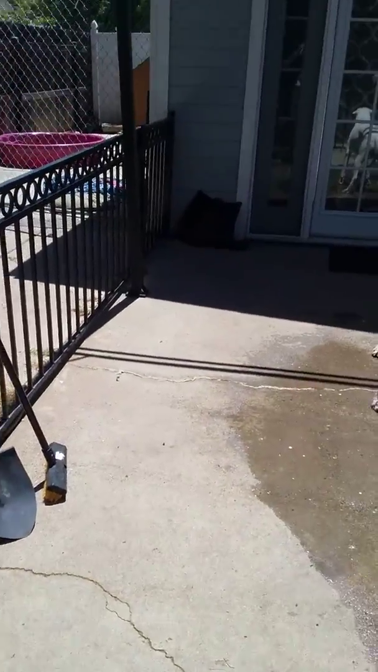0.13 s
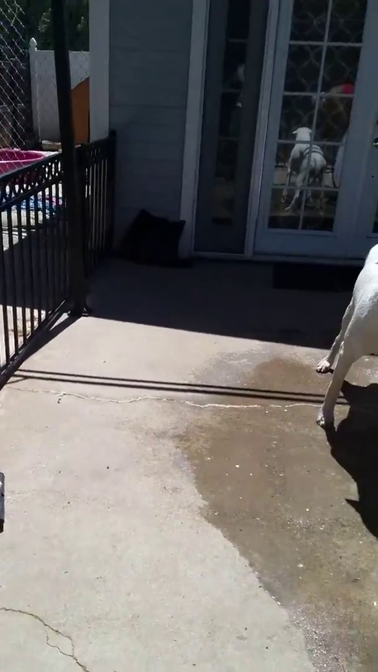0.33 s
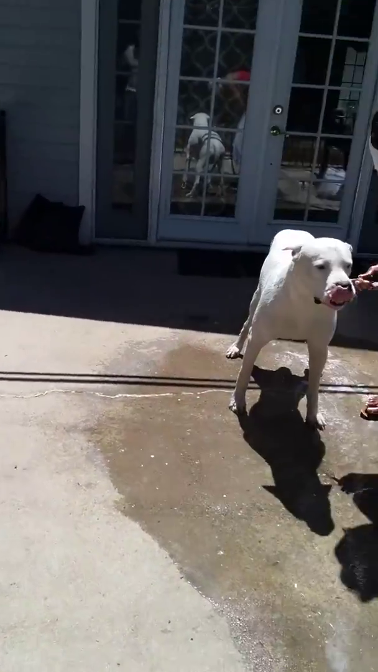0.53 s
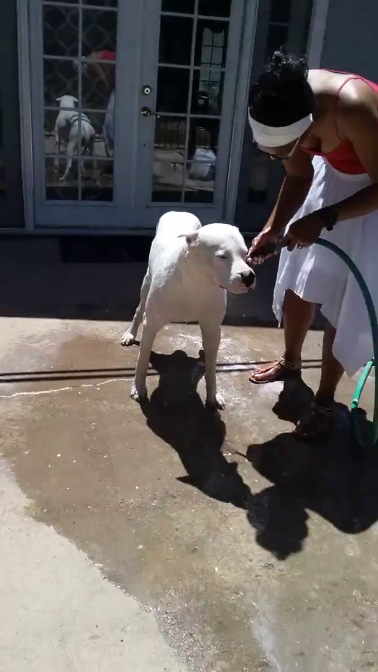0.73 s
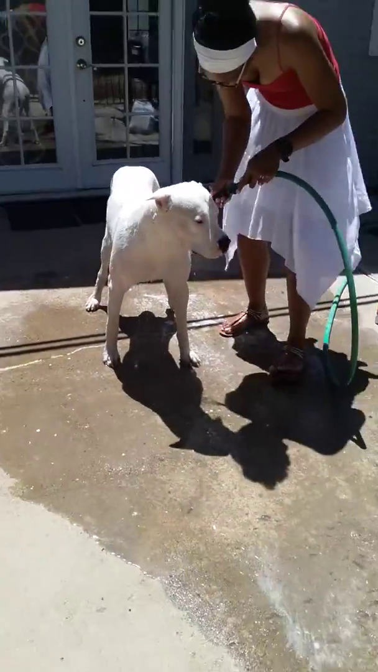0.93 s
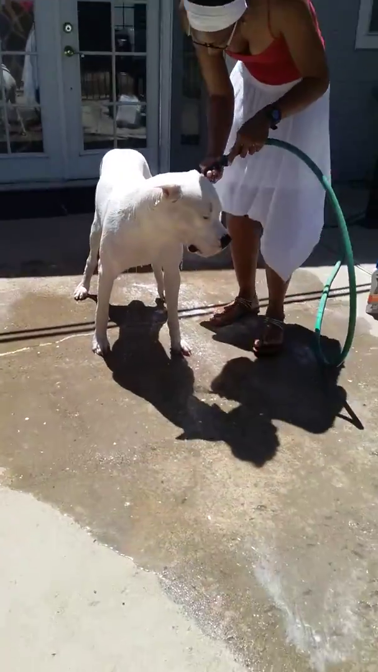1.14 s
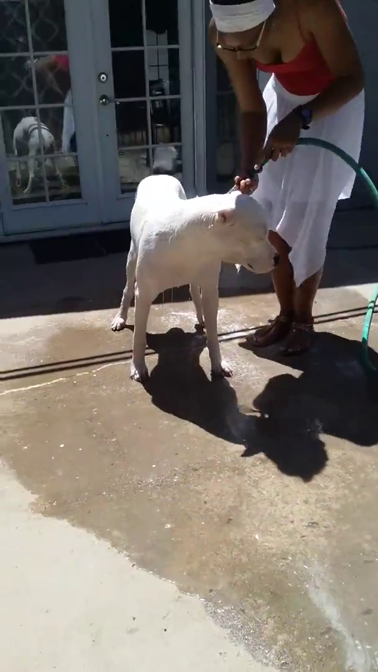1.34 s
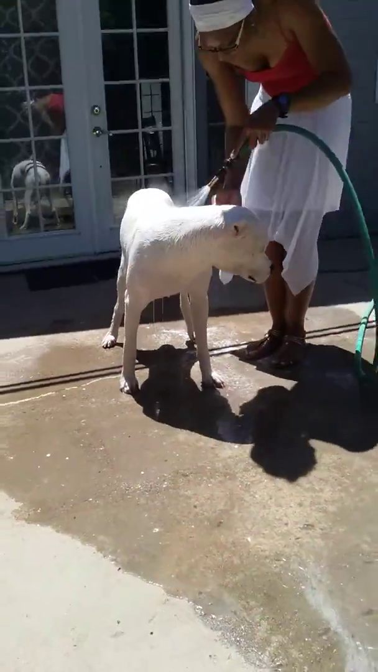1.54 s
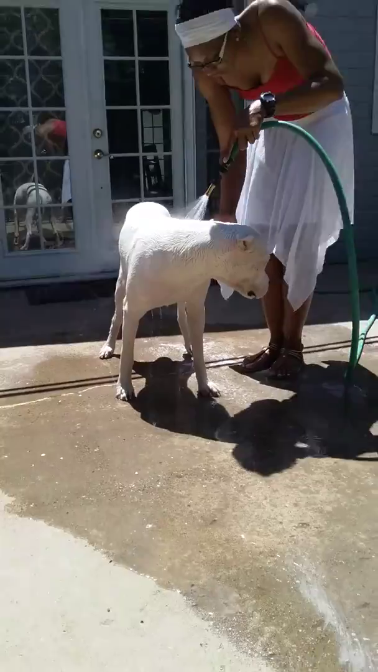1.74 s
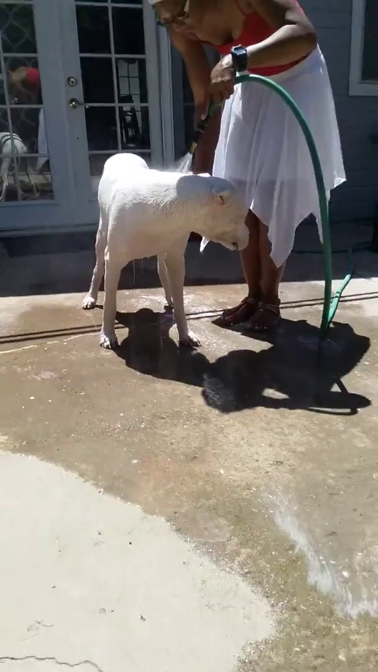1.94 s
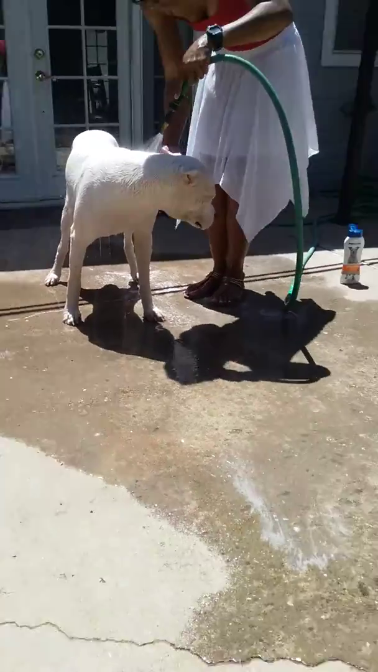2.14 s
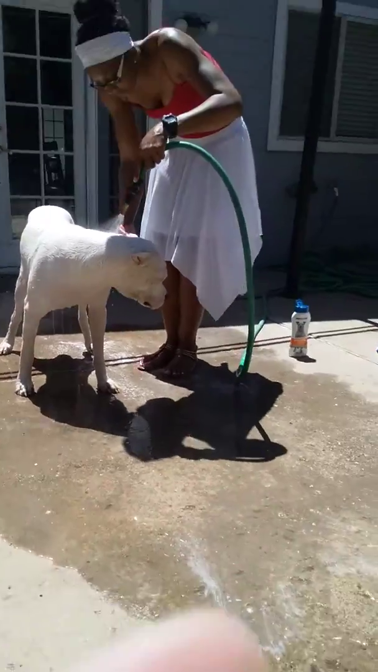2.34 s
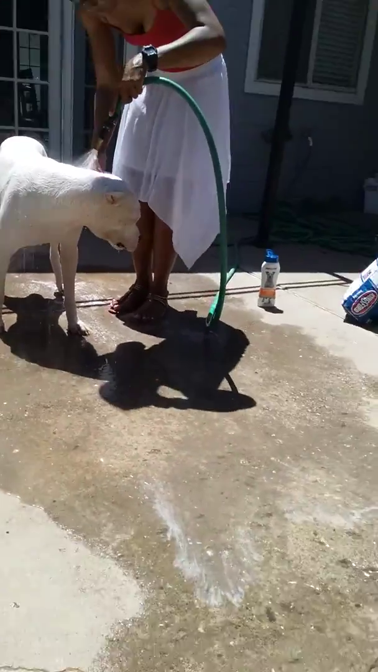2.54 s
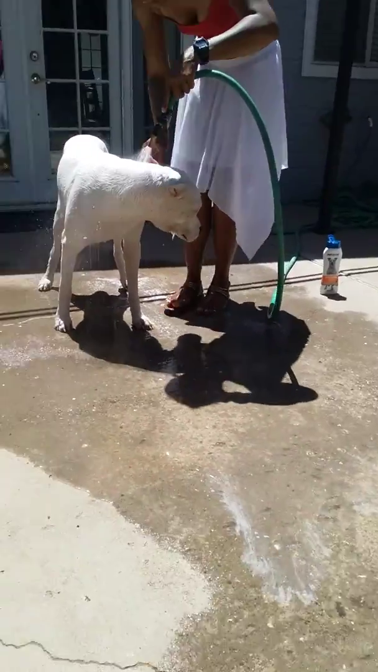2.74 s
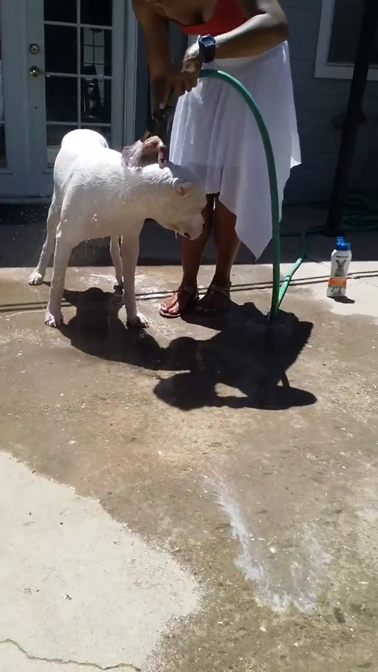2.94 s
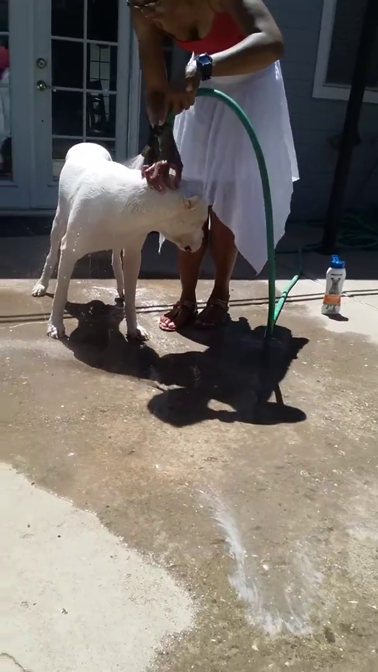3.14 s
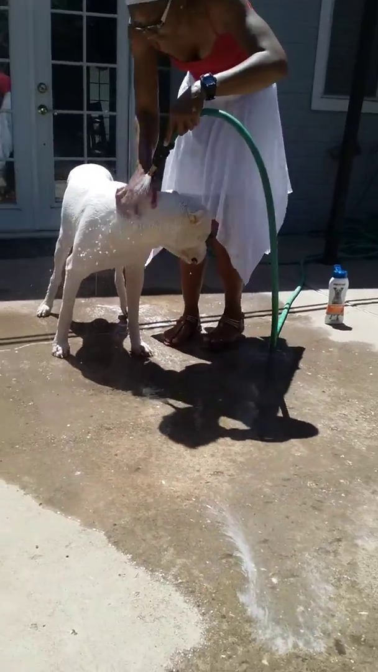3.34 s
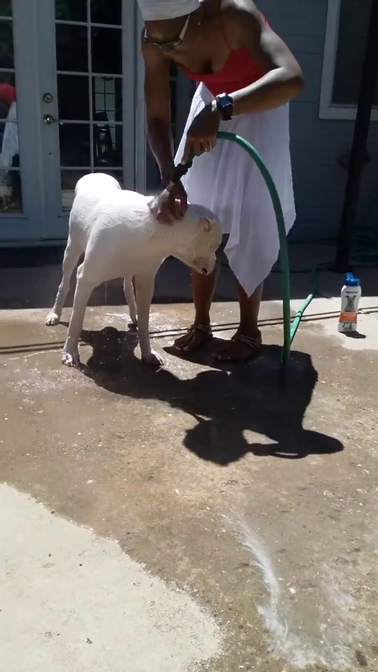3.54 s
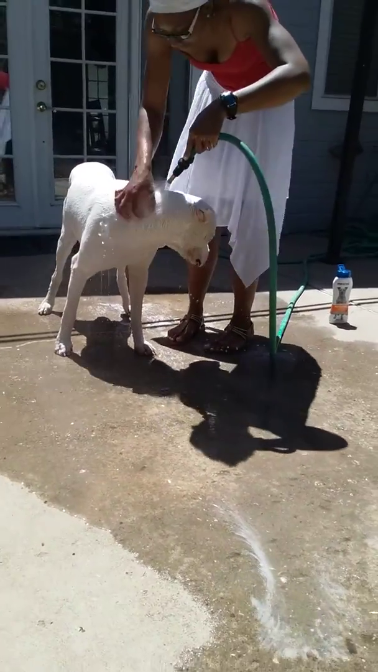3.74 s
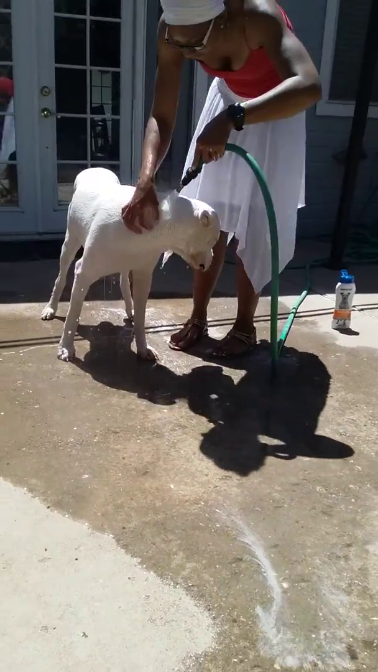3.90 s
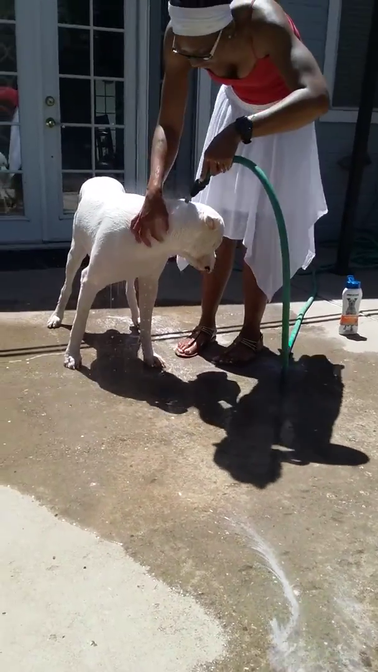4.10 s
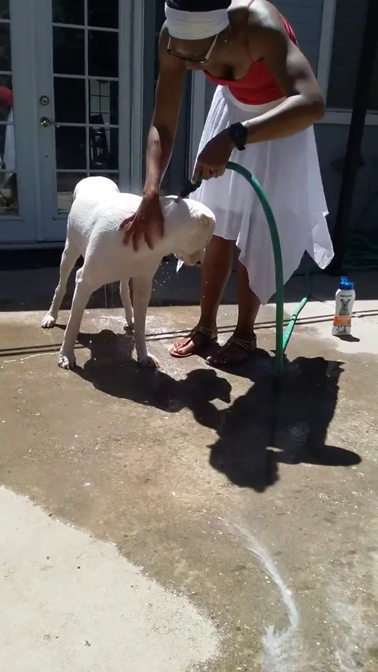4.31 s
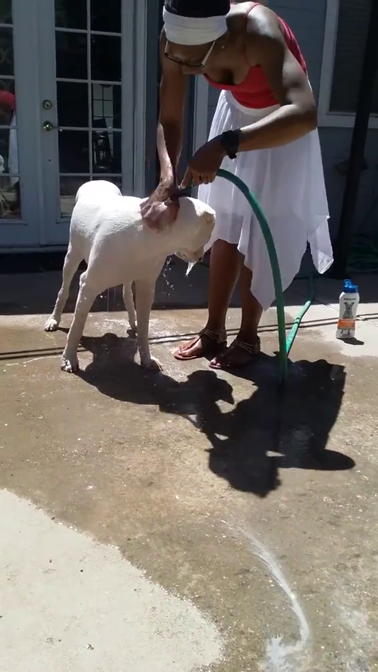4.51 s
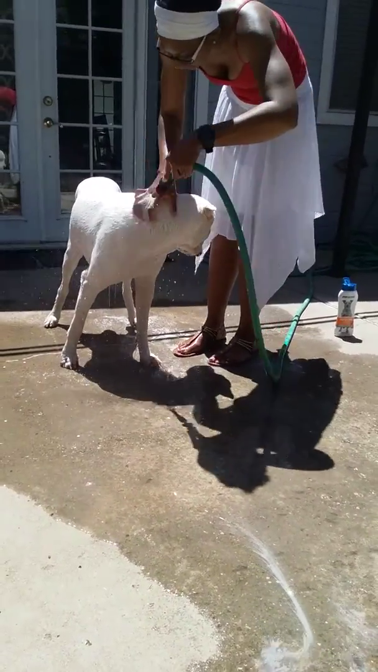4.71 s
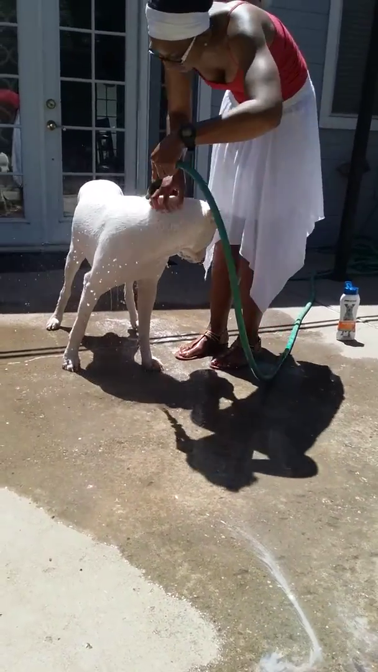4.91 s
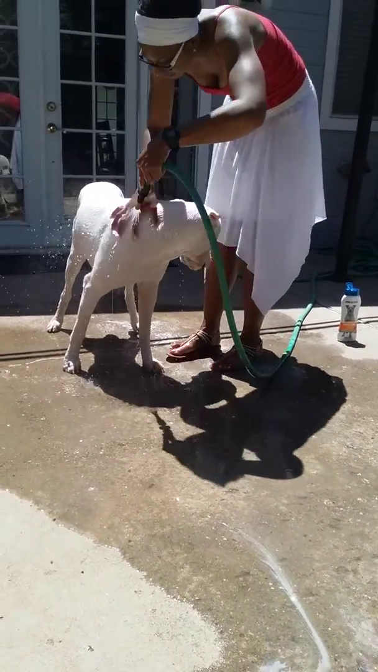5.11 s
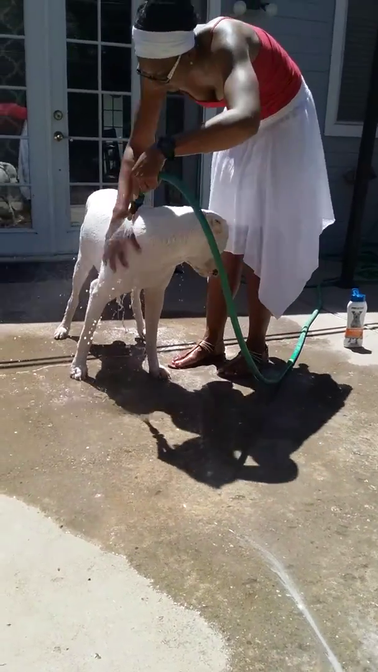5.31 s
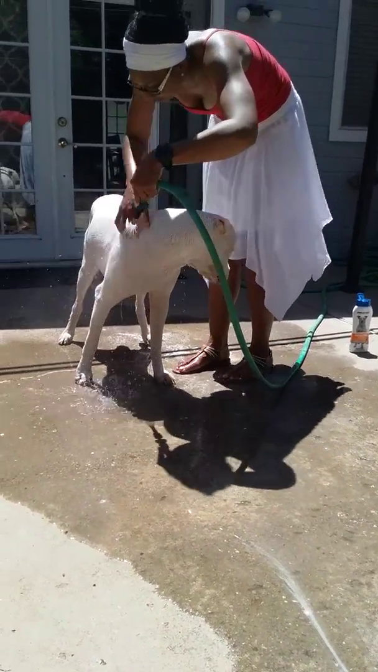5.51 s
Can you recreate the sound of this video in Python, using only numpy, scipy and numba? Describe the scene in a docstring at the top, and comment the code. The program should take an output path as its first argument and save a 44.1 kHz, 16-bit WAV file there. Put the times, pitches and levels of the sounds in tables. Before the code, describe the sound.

A door bangs and knocks nearby while a hose sprays steadily, water splashing and gurgling on a dog's wet coat.

```python
"""Hosing a dog on a patio

A garden hose rinses a dog on concrete, a couple of metres from a hand-held phone. Countless drop
impacts add up to noise: mist hisses, the jet splashes and gurgles in resonant hollows of the coat,
run-off patters. Close on the right a door bangs, knocks again and later bumps softly, ringing in its
damped modes. Sandals shuffle, two drips ring as bubbles, and a low drone lies underneath."""
import sys
import numpy as np
from scipy import signal
from scipy.fft import rfft, irfft
from scipy.io import wavfile
from scipy.ndimage import uniform_filter1d, map_coordinates
from numba import njit

SR = 44100
rng = np.random.default_rng(int(sys.argv[2]) if len(sys.argv) > 2 else 0)


def to_wav(s):
    """Save 16-bit WAV."""
    ch = np.atleast_2d(s).T  # columns
    pcm = np.round(np.clip(ch, -1, 1) * 32767)  # PCM
    wavfile.write(sys.argv[1], SR, pcm.astype(np.int16))


N = 245136
T = np.arange(N) / SR

# nozzle mist, loudest once it points clear of the dog: time_s, level_db
MIST_LEVEL = [(0, -58), (.08, -46.5), (.24, -50), (.42, -43.5), (.56, -46.5), (.68, -50), (1.38, -48),
              (1.78, -40.5), (2.35, -41.5), (2.65, -42.3), (3.35, -40.5), (3.7, -41.5), (4.3, -41),
              (5.56, -41.5)]
# the mist drifts from the right to the centre: time_s, left_minus_right_db
MIST_PAN = [(0, -3.5), (.8, -3.5), (2.3, -2), (2.8, -0.1), (5.56, 1.2)]
# resonances of the coat, set by where the jet lands: time_s, splash_hz, gurgle_hz
COAT_RESONANCES = [(0, 3180, 1717), (.55, 3450, 1520), (.83, 2540, 2305), (1.45, 3480, 1840),
                   (1.95, 3337, 2190), (2.17, 3595, 1880), (2.3, 2500, 1940), (2.72, 3215, 2050),
                   (2.9, 3500, 1600), (3.05, 3660, 1398), (3.4, 3650, 1854), (3.56, 3750, 1340),
                   (3.9, 3314, 1824), (4.4, 3280, 1740), (4.7, 3840, 1470), (5.1, 3190, 1917),
                   (5.56, 3900, 1800)]
# steady wash of the jet over the coat: time_s, splash_db, gurgle_db
WASH = [(0, -66, -69), (.12, -52.5, -68), (.5, -44.5, -55), (1.0, -46, -58.5), (1.25, -44.5, -50.5),
        (1.74, -47, -52.5), (1.87, -42.5, -50.5), (2.26, -43, -43.5), (2.58, -46, -52), (3.19, -47, -47),
        (3.3, -49, -53.5), (3.46, -58.5, -51.5), (3.68, -47, -57), (3.83, -39, -46.5), (4.33, -38.3, -47.5),
        (4.57, -47.5, -54), (4.68, -42, -49.5), (5.1, -41, -46), (5.36, -54, -54), (5.56, -38.5, -50)]
# the jet hits the coat squarely: start_s, length_s, splash_db, gurgle_db
GUSHES = [(0.513, 0.038, -39, -48), (0.773, 0.094, -49, -49), (1.096, 0.087, -55, -46.5),
          (1.46, 0.053, -43, -52), (1.564, 0.056, -42.5, -47.5), (1.817, .11, -44, -46),
          (2.455, 0.073, -42, -48), (2.616, 0.09, -42, -43.5), (2.812, 0.11, -43, -43.5),
          (3.337, 0.046, -40.5, -52), (3.49, .07, -48, -52), (4.083, .08, -56, -45),
          (4.29, 0.083, -46, -43), (4.79, .06, -59, -50), (4.948, 0.13, -45, -53),
          (5.135, 0.047, -36.5, -49), (5.428, 0.047, -40, -57)]
# spectra of the water and the distant drone: frequency_hz, gain_db
MIST_SPECTRUM = [(2500, -12), (4500, -1), (5600, -4.5), (6700, -4), (9000, -5), (10500, -8), (12500, -10.5),
                 (15800, -14.5)]
SPLASH_SPECTRUM = [(1200, -26.5), (1950, -6.5), (2220, -6.5), (2550, -2.5), (3600, -3.5), (4900, -2),
                   (5600, -11.5), (9000, -18.5)]
GURGLE_SPECTRUM = [(200, -26), (450, -20.5), (800, -1), (1100, -6), (1400, -0.5), (2000, -4.5), (2700, 0),
                   (4500, -35.5)]
PATTER_SPECTRUM = [(200, -12.5), (450, -7.5), (800, -1.5), (1500, -4), (3000, -5), (8000, -8.5)]
DRONE_SPECTRUM = [(40, -10.5), (55, 3), (80, -5), (108, 2), (155, -12), (200, -5), (245, -17.5), (290, -8),
                  (350, -23.5)]
# slow course of the drone: time_s, level_db
DRONE_LEVEL = [(0, -61), (1.5, -62.5), (2.6, -60.5), (5.5, -59.5)]
# door blows: start_s, clack_db, thud_db, panel_db, sway_db, panel_cutoff_hz, panel_t60_ratio, echo_db
DOOR_BLOWS = [(0.2415, -7.5, -10.5, -11, -60, 2500, 0.76, -25.5),
              (.320, -25.5, -38, -48, -60, 2500, 0.83, -44.5), (.5565, -24, -25, -34.5, -56, 1220, 1, -43),
              (0.5892, -47, -29.5, -41, -62, 600, 0.99, -62),
              (2.3036, -31.5, -25.5, -36.5, -21, 520, 0.44, -59),
              (2.3132, -56, -31, -38, -45, 400, 0.37, -66)]
# modes of the latch, the swaying leaf, its thud and its panel: pitch_hz, gain_db, t60_s
LATCH_MODES = [(712.6, -7, 0.088), (926, -5.5, 0.094), (1525, 2, 0.042), (1598, -2, 0.072),
               (2120, -11, 0.04), (2440, -9.5, 0.0418), (2850, -22, 0.0224), (4040, -14.5, 0.0565)]
SWAY_MODES = [(71.4, -12, 0.15)]
THUD_MODES = [(126.3, -10, 0.11), (213.6, -4, 0.0532), (334.5, 5, 0.015)]
PANEL_MODES = [(168, -2.5, 0.26), (269.7, -13, 0.36), (316.4, -10.5, 0.29), (385, -15.5, 0.6),
               (477.3, 2, 0.28), (611, -20.5, 1), (713, 0, 0.16), (884, -18.5, 0.49), (1179, -35, 0.7),
               (1351, -39, 0.66), (1397, -32, 0.47), (1540, -28.5, 0.17), (1645, -34.5, 0.58),
               (1796, -28.5, 0.36), (1954, -34.5, 0.36), (1992, -35, 0.36)]
# spectra of the latch rattle and the echo off the walls: frequency_hz, gain_db
RATTLE_SPECTRUM = [(200, -11.5), (450, -0.5), (1500, 2), (2500, -6.5), (4200, -14), (6000, -25.5),
                   (9000, -44), (15000, -53)]
ECHO_SPECTRUM = [(70, -8.5), (160, 5.5), (300, 2), (550, 0), (850, -3), (1150, -6), (1600, -4.5),
                 (2500, -11.5), (4200, -20), (8000, -45)]
# reverberation time: frequency_hz, t60_s
ECHO_T60 = [(150, 0.76), (500, 0.17), (1500, 0.5), (5000, 0.13)]
# sandal shuffles, ringing hollows of the coat, slaps of water: start_s, level_db, centre_hz, t60_s
SHUFFLES = [(.785, -48.5, 128, 0.22), (1.07, -57, 600, 0.28), (1.14, -53, 445, 0.36),
            (2.098, -50.5, 446, 0.11), (2.152, -51.5, 420, 0.19)]
HOLLOWS = [(2.25, -40.5, 2120, .4), (2.33, -43, 8300, .5), (2.395, -45, 2150, 0.6), (3.11, -45, 6500, 1),
           (3.51, -45.5, 1240, 0.3), (4.24, -39, 3530, 0.61), (4.31, -38, 1745, 0.56),
           (4.485, -41.5, 1720, 0.34), (4.78, -43, 2500, 0.99), (5.09, -42, 2520, 0.57)]
SLAPS = [(3.501, -30.5, 2510, .035), (4.608, -24.5, 3600, 0.016), (4.621, -25, 3360, 0.024),
         (5.257, -34.5, 3020, 0.056)]
# drips into a puddle: start_s, level_db, pitch_hz, t60_s
DRIPS = [(5.3772, -27.5, 1720, 0.03), (5.398, -42, 1657, .04)]
# imbalance of the two microphone ports: frequency_hz, left_minus_right_db
PORT_BALANCE = [(100, -2), (400, -1), (1200, -3), (1900, -3.5), (2400, -3.5), (3000, -3.5), (3800, -6.5),
                (4400, 4.5), (5100, 5), (5800, 3.5), (11000, 1.5), (15000, -2.5)]

JET_LAG_S, DOOR_LAG_S = 0.00012, 0.00038  # travel time between the ports
GUSH_ATTACK_S, GUSH_RELEASE_S = .03, .04
LOW_CUT_HZ, HIGH_CUT_HZ = 61, 15800
LONGEST_MODE_T60_S = .45


def undb(db):
    """Decibels to amplitude ratio."""
    return 10 ** (np.asarray(db) / 20)


def unit(x):
    """Normalise to rms 1."""
    return x / np.sqrt(np.mean(x ** 2))


def curves(table):
    """Linear interpolation of each column of a timed table."""
    times, *columns = np.transpose(table)
    return [np.interp(T, times, column) for column in columns]


def at_hz(table, hz):
    """Interpolation on a log-frequency axis."""
    f, value = np.transpose(table)
    return np.interp(np.log(hz + 1e-3), np.log(f), value)


def bins():
    """Frequencies of the Fourier bins."""
    return np.arange(N // 2 + 1) * SR / N


def colour(x, spectrum):
    """Spectral shaping, falling 12 dB an octave beyond the table's ends; rms 1."""
    f = bins() + 1e-3
    skirts = np.minimum(f / spectrum[0][0], 1) ** 2 * np.minimum(spectrum[-1][0] / f, 1) ** 2
    return unit(irfft(rfft(x) * undb(at_hz(spectrum, f)) * skirts, N))


def wander(rate_hz):
    """Smooth random modulation of rms 1."""
    hold = max(int(SR / rate_hz), 2)
    steps = np.repeat(rng.standard_normal(N // hold + 2), hold)
    steps = steps[rng.integers(hold):][:N]
    return unit(uniform_filter1d(uniform_filter1d(steps, hold), hold))


def delay(x, lag_s):
    """Propagation delay, fixed or moving."""
    return map_coordinates(x, [np.arange(N) - lag_s * SR], order=3)


def fade(start, t60, rise_s=0.00057):
    """Exponential decay after a quick rise."""
    age = np.maximum(T - start, 0)
    return (1 - np.exp(-(age / rise_s) ** 2)) * np.exp(-np.log(1000) * np.minimum(age / t60, 10))


def ring(start, modes, cutoff_hz=9000, t60_ratio=1, rise_s=.0004):
    """Free vibration as a sum of damped modes; a soft contact barely excites those above the cutoff."""
    age = np.arange(SR) / SR
    wave = 0
    for k, (hz, db, t60) in enumerate(modes):
        amplitude = (-1) ** k * undb(db) / np.hypot(1, (hz / cutoff_hz) ** 4)
        decay = np.exp(-np.log(1000) * age / min(t60 * t60_ratio, LONGEST_MODE_T60_S))
        wave = wave + amplitude * np.cos(2 * np.pi * hz * age) * decay
    return np.interp(T - start, age, wave * (1 - np.exp(-age / rise_s)), left=0, right=0)


@njit
def resonate(x, hz, width_hz):
    """A resonance with a moving centre: a state-variable band-pass."""
    y, band_state, low_state = np.empty(len(x)), 0., 0.
    for i in range(len(x)):
        g, damping = np.tan(np.pi * hz[i] / SR), width_hz / hz[i]
        band = (band_state + g * (x[i] - low_state)) / (1 + g * (g + damping))
        band_state, low_state = 2 * band - band_state, low_state + 2 * g * band
        y[i] = damping * band
    return y


def drops(per_s, spread_db):
    """Shot noise: independent impacts, many small and a few large."""
    hit = rng.random(N) < per_s / SR
    return unit(hit * rng.standard_normal(N) * undb(spread_db * np.minimum(rng.exponential(size=N), 5)))


def diffuse(coherent_hz):
    """A diffuse noise field: the two ports are coherent only at long wavelengths."""
    mid, side = rng.standard_normal((2, N))
    coherence = 1 / (1 + (bins() / coherent_hz) ** 2)
    mid = irfft(rfft(mid) * np.sqrt(1 + coherence), N)
    side = irfft(rfft(side) * np.sqrt(1 - coherence), N)
    return np.array([mid + side, mid - side])


def bursts(table, relative_width, rise_s=0.0011):
    """Decaying bands of noise; the narrower the band, the clearer its pitch."""
    total = 0
    for start, db, hz, t60 in table:
        band = np.exp(-(np.log((bins() + 1) / hz) / relative_width) ** 2)
        noise = unit(irfft(rfft(diffuse(920)) * band, N))
        total = total + undb(db) * noise * fade(start, t60, rise_s)
    return total


def reflections(x, bounce, sway_s, sway_hz):
    """Comb filtering: five paths per port, off coat and ground, shift as the jet moves; rms 1."""
    ports = [x, delay(x, JET_LAG_S)]
    for port in range(2):
        for k in range(5):
            path_s = (k + rng.random()) * .0018 + .0009
            polarity = rng.choice([-1, 1])
            ports[port] = ports[port] + bounce * polarity * delay(x, path_s + sway_s * wander(sway_hz))
    return unit(np.array(ports))


def nozzle_mist():
    """Superposition: fine droplets come so densely that they merge into a hiss."""
    level_db, = curves(MIST_LEVEL)
    pan_db, = curves(MIST_PAN)
    hiss = colour(drops(per_s=36000, spread_db=0.95), MIST_SPECTRUM)
    hiss = reflections(hiss, bounce=.55, sway_s=.00012, sway_hz=7)
    return hiss * undb(level_db + wander(35) + np.array([pan_db, -pan_db]) / 2)


def coat_gains():
    """Incoherent sources add in power: wash and gushes set the gains of splash and gurgle."""
    power = undb(curves(WASH)) ** 2
    for start, length, splash_db, gurgle_db in GUSHES:
        swell = np.clip((T - start) / GUSH_ATTACK_S, 0, 1)
        drain = np.clip(1 - (T - start - length) / GUSH_RELEASE_S, 0, 1)
        power = power + np.outer(undb([splash_db, gurgle_db]), swell * drain) ** 2
    return np.sqrt(power)


def coat_splash(centre_hz, gain):
    """Impact noise: drops drum on the coat, fluttering as the jet breaks into slugs."""
    impacts = drops(per_s=8000, spread_db=2.4)
    resonance = unit(resonate(impacts, centre_hz, width_hz=1600.))
    splash = colour(resonance + 0.76 * impacts, SPLASH_SPECTRUM)
    splash = reflections(splash, bounce=0.72, sway_s=0.0001863, sway_hz=6)
    return splash * gain * undb(0.46 * wander(40))


def coat_gurgle(centre_hz, gain):
    """Cavity resonance: slugs of water drive the wet hollows of the coat."""
    slugs = drops(per_s=3000, spread_db=1.7)
    resonance = unit(resonate(slugs, centre_hz, width_hz=622.))
    gurgle = colour(resonance + 0.72 * slugs, GURGLE_SPECTRUM)
    gurgle = reflections(gurgle, bounce=0.37, sway_s=0.00028, sway_hz=6)
    return gurgle * gain * undb(0.99 * wander(40))


def run_off():
    """Scattered impacts on concrete form a diffuse patter in which single drops stand out."""
    patter = diffuse(1030) * (1 + 0.65 * np.abs(drops(per_s=1000, spread_db=1.5)))
    return colour(patter, PATTER_SPECTRUM) * undb(-56 + 0.99 * wander(14))


def drone():
    """Low noise with spectral peaks, wavering under slow amplitude modulation."""
    level_db, = curves(DRONE_LEVEL)
    waver_db = 1.6 * wander(9)
    return colour(diffuse(450), DRONE_SPECTRUM) * undb(level_db + waver_db)


def door():
    """Impacts excite modes: the latch clacks and rattles, then the leaf meets the frame and rings."""
    direct, rattle = 0, 0
    grit = colour(diffuse(903), RATTLE_SPECTRUM)
    for start, clack_db, thud_db, panel_db, sway_db, cutoff_hz, t60_ratio, _ in DOOR_BLOWS:
        rattle_envelope = fade(start, t60=0.035) + .07 * fade(start + 0.00572, t60=0.14)
        rattle = rattle + undb(clack_db - 1.5) * grit * rattle_envelope
        latch = undb(clack_db) * ring(start, LATCH_MODES)
        sway = undb(sway_db) * ring(start + 0.0082, SWAY_MODES)
        thud = undb(thud_db) * ring(start + 0.00852, THUD_MODES)
        panel = undb(panel_db) * ring(start + .0092, PANEL_MODES, cutoff_hz, t60_ratio)
        direct = direct + latch + sway + thud + panel
    # the door is on the right, so the left port hears it later
    return np.array([delay(direct, DOOR_LAG_S), direct]) + rattle


def door_echo():
    """Reverberation: the walls return each blow after 21 ms, each octave decaying at its own rate."""
    spectrum = rfft(colour(diffuse(670), ECHO_SPECTRUM))
    octave = np.log2(np.clip(bins(), 100, 6400) / 100)
    echo = 0
    for k in range(7):
        band = irfft(spectrum * np.sqrt(np.maximum(1 - np.abs(octave - k), 0)), N)
        t60 = at_hz(ECHO_T60, 100 * 2 ** k)
        envelope = sum(undb(echo_db) * fade(start + 0.021, t60) for start, *_, echo_db in DOOR_BLOWS)
        echo = echo + band * envelope
    return echo


def sandals():
    """Friction of shuffling soles gives low, broad bands of noise."""
    return bursts(SHUFFLES, relative_width=0.54)


def ringing_hollows():
    """Narrow resonance: the jet rings one hollow in the wet coat for a moment."""
    return bursts(HOLLOWS, relative_width=0.074, rise_s=0.0098)


def water_slaps():
    """Brief impacts of water spread their energy over a wide band."""
    return bursts(SLAPS, relative_width=0.35)


def drips():
    """Bubble resonance: each large drip traps air that rings briefly."""
    plinks = sum(ring(start, [(hz, db, t60)], rise_s=0.00031) for start, db, hz, t60 in DRIPS)
    return np.array([plinks, delay(plinks, JET_LAG_S)])


def scene():
    """Linear superposition of all sources at the two ports."""
    splash_hz, gurgle_hz = curves(COAT_RESONANCES)
    splash_gain, gurgle_gain = coat_gains()
    jet = nozzle_mist() + coat_splash(splash_hz, splash_gain) + coat_gurgle(gurgle_hz, gurgle_gain)
    water = jet + run_off() + water_slaps() + ringing_hollows() + drips()
    return water + door() + door_echo() + sandals() + drone()


def record(dry):
    """Transducer response: each port colours the sound; the phone thins the bass, clips, cuts the top."""
    tilt_db = at_hz(PORT_BALANCE, bins()) / 2
    ported = irfft(rfft(dry) * undb(np.array([tilt_db, -tilt_db])), N)
    high_pass = signal.butter(4, LOW_CUT_HZ, "high", fs=SR, output="sos")
    low_pass = signal.ellip(10, .2, 80, HIGH_CUT_HZ, fs=SR, output="sos")
    clipped = np.clip(signal.sosfilt(high_pass, ported), -1, 1)
    return signal.sosfilt(low_pass, clipped)


dry = scene()
out = record(dry)
to_wav(out)
```